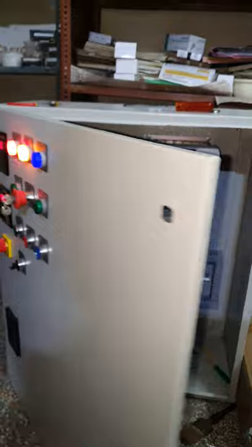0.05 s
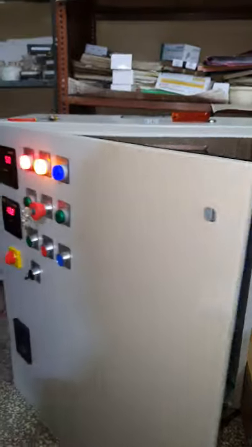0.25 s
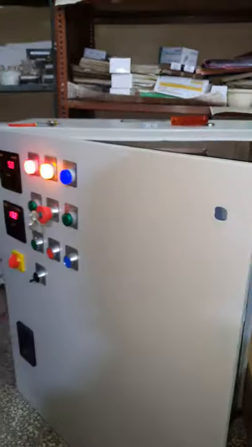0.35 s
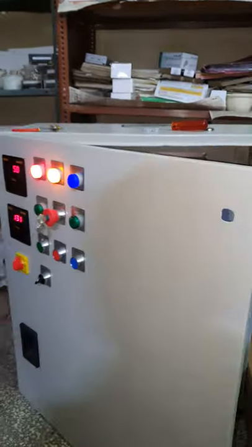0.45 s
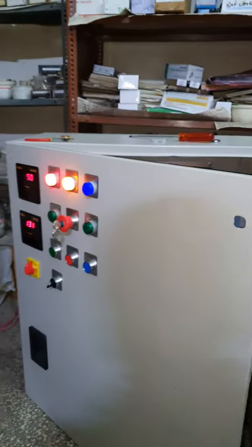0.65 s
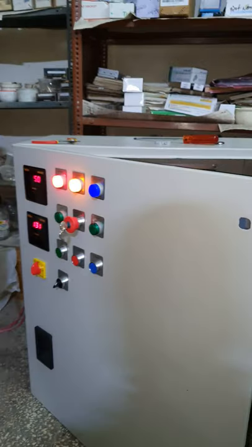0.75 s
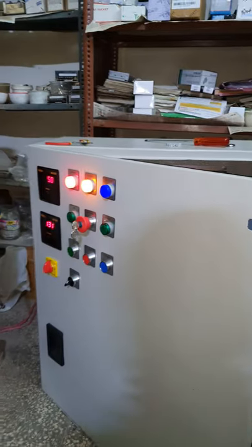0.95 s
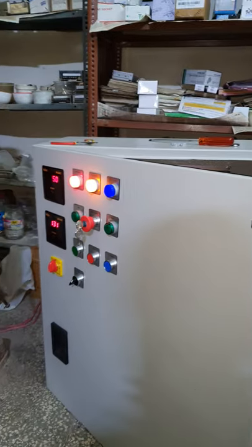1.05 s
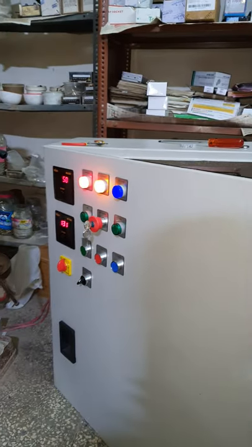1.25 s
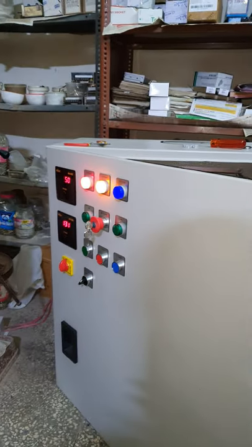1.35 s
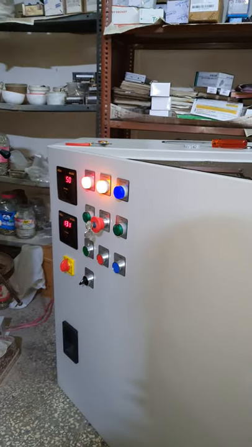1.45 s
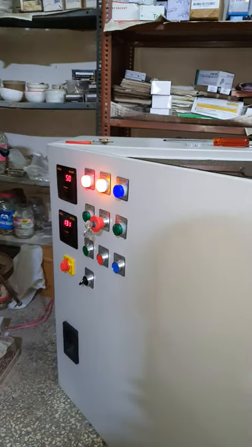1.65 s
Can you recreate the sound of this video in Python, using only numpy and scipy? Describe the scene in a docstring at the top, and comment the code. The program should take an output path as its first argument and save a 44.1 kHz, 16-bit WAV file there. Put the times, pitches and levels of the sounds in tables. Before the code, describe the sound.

A steel cabinet door bangs at about 0.2 seconds, after a faint hinge groan. The panel rebounds, rings and wobbles while loose fittings clatter, dying down by about 0.9 seconds with a faint creak. A duller thud with a sharp click lands at about 1.1 seconds, and a soft last knock comes near 1.6 seconds. A low hum and slight hiss lie underneath in the small workshop.

```python
"""A banging steel cabinet door

A sheet-steel door swings on a hinge that groans faintly by stick-slip friction, and bangs in a small,
hard-walled workshop. The impacts excite the panel's modes: it rings and wobbles, and its loose fittings
clatter. A duller thud and a soft last knock follow. A low hum and a little hiss lie underneath."""
import sys
import numpy as np
from scipy import signal
from scipy.fft import rfft, irfft, next_fast_len
from scipy.io import wavfile
from scipy.ndimage import map_coordinates

SR = 44100
rng = np.random.default_rng(int(sys.argv[2]) if len(sys.argv) > 2 else 0)


def int16_out(signal):
    """Quantize to a 16-bit WAV file."""
    q = np.round(np.clip(np.atleast_2d(signal).T, -1, 1) * 32767)
    wavfile.write(sys.argv[1], SR, q.astype(np.int16))


N = 74970
T = np.arange(N) / SR

# spectrum of rattling and scraping steel: f/Hz, relative level/dB
STEEL_SPECTRUM = [(300, -25), (1500, -5), (5800, 1.5), (8200, -9.5), (11000, -2.5), (13000, -7.5),
                  (15500, -19)]
# likeness of left and right in the room: f/Hz, correlation
COHERENCE = [(100, 0.94), (380, 0.86), (950, 0.15), (2400, 0), (15000, 0.058)]


def amp(db):
    """Amplitude grows tenfold for every 20 dB."""
    return 10 ** (np.asarray(db) / 20)


def along(points, hz):
    """Interpolation of (f/Hz, value) points on a logarithmic frequency axis."""
    f, values = np.transpose(points)
    return np.interp(np.log(hz + 1), np.log(f + 1), values)


def filtered(x, response):
    """Linear filtering: the spectrum is multiplied by a frequency response."""
    size = next_fast_len(N + 8192)
    return irfft(rfft(x, size) * response(np.fft.rfftfreq(size, 1 / SR)), size)[..., :N]


def wobble(rate):
    """Random modulation: a smooth curve through rate Gaussian values a second."""
    return map_coordinates(rng.standard_normal(N // 20), [T * rate], mode="mirror")


def at(onset, x):
    """A pure delay of onset seconds."""
    return np.pad(x, ((0, 0), (max(round(onset * SR), 0), 0)))[:, :N]


def swell(onset, length):
    """A half-sine envelope."""
    return np.sin(np.pi * np.clip((T - onset) / length, 0, 1))


def stereo_angle(hz):
    """Half the phase angle whose cosine is the left-right correlation."""
    return np.arccos(np.clip(along(COHERENCE, hz), -1, 1)) / 2


def noise(spectrum, tilt_db=0, cut_hz=SR, bass_db=0, ripple_db=0):
    """Partly coherent stereo noise of rms 1; ripple gathers the treble into crowded resonances."""
    def response(hz):
        octaves = np.log2((hz + 1) / 1000)
        ripple = map_coordinates(rng.standard_normal(N // 20), [hz / 32])
        peaks = np.clip(ripple, -2, 2) * np.clip(octaves, 0, 1)
        shelf_db = bass_db / (1 + (hz / 280) ** 4)
        db = along(spectrum, hz) + tilt_db * octaves + shelf_db + ripple_db * peaks
        gain = amp(db) / np.hypot(1, (hz / cut_hz) ** 2)
        angle = stereo_angle(hz)
        return gain * np.array([np.cos(angle), np.sin(angle)])
    mid, side = filtered(rng.standard_normal((2, N)), response)
    stereo = np.array([mid + side, mid - side])
    return stereo / np.sqrt(np.mean(stereo ** 2) + 1e-20)


def clang(wash, t60, hold_s, attack_s, grain_db):
    """Reverberation of dense modes: grainy early echoes hold the level, then each band decays."""
    hz, t, bands = signal.stft(wash, SR, nperseg=256)
    fade = amp(-60 * np.maximum(t - hold_s, 0) / along(t60, hz)[:, None])
    tail = signal.istft(bands * fade, SR, nperseg=256)[1][:, :N]
    grain = amp(grain_db * wobble(862) * np.exp(-T / 0.016))
    return tail * grain * (1 - np.exp(-T / attack_s))


def ring(modes, hits, rise_s, drift_rad, flutter_db):
    """Damped, unsteady modes sum the energy of the hits (t/s, level/dB); each ear has its own phase."""
    out = np.zeros((2, N))
    ages = [(np.maximum(T - onset, 0), db) for onset, db in hits]
    for hz, db, t60 in modes:
        energy = sum((amp(level - 60 * age / t60) * (1 - np.exp(-age / rise_s))) ** 2
                     for age, level in ages)
        apart = stereo_angle(hz) * rng.choice([-1, 1]) * np.array([[1], [-1]])
        phase = 2 * np.pi * (hz * T + rng.random()) + drift_rad * wobble(25.56) + apart
        out += amp(db + flutter_db * wobble(21.59)) * np.sqrt(energy) * np.sin(phase)
    return out


def stick_slip(pitch_hz, levels, jitter_hz, rasp, rasp_hz):
    """Stick-slip oscillation: uneven slips spread hoarse sidebands around a tone."""
    phase = 2 * np.pi * np.cumsum(pitch_hz + jitter_hz * wobble(260)) / SR
    sidebands = np.array([wobble(rasp_hz) * np.sin(phase) + wobble(rasp_hz) * np.cos(phase)
                          for _ in range(2)])
    db = np.interp(T, *levels, left=-np.inf, right=-np.inf) + 1.8 * wobble(70.4)
    return amp(db) * (np.sin(phase) + rasp * sidebands) / np.hypot(1, rasp)


def glide(points, **roughness):
    """Stick-slip oscillation whose pitch and level follow (t/s, f/Hz, level/dB) points."""
    times, hz, db = np.transpose(points)
    return stick_slip(np.interp(T, times, hz), (times, db), **roughness)


def workshop():
    """Background noise: a low rumble and a hum that wavers by phase modulation."""
    hum_tones = [(97, -76.5), (140, -73.5)]  # f/Hz, level/dB
    rumble_spectrum = [(20, -15.5), (45, -6.5), (80, 6.5), (150, -6), (300, -9), (600, -28.5), (4000, -38),
                       (8000, -46)]  # f/Hz, relative level/dB
    hum = sum(amp(db) * np.sqrt(2) * np.sin(2 * np.pi * hz * T + 0.99 * wobble(9))
              for hz, db in hum_tones)
    return amp(-65.5) * noise(rumble_spectrum) + hum


def hinge():
    """Friction: the sliding door rubs and scrapes; stick-slip makes its hinge groan, creak and squeal."""
    rub_levels = [(0, -69.5), (.2, -70.5), (.72, -77.5), (1.07, -80.5), (1.25, -100), (1.5, -100),
                  (1.55, -80.5)]  # t/s, level/dB
    rub_spectrum = [(200, -46), (600, 17), (1400, -2.5), (2300, 2), (5500, -4.5), (8000, -15),
                    (11000, -10.5), (15000, -25)]  # f/Hz, relative level/dB
    scrapes = [(0.607, 0.079, -60.5), (0.852, 0.23, -74)]  # t/s, length/s, level/dB
    closing_groan = [(0, 578, -67.5), (.035, 509.3, -60.5), (.125, 496, -56.5), (.175, 490.4, -60),
                     (.23, 443, -54.5)]  # t/s, f/Hz, level/dB
    backswing_creak = [(.78, 988, -88.5), (.91, 866, -73), (1.07, 828, -78.5)]  # t/s, f/Hz, level/dB
    squeal_levels = [(.66, -81), (.83, -78), (.89, -91), (1.219, -77), (1.31, -95), (1.38, -80),
                     (1.43, -98)]  # t/s, level/dB
    rub = amp(np.interp(T, *np.transpose(rub_levels))) * noise(rub_spectrum, ripple_db=2.5)
    scrape = sum(amp(db) * swell(onset, length) for onset, length, db in scrapes) * noise(STEEL_SPECTRUM)
    groan = glide(closing_groan, jitter_hz=17.3, rasp=0.52, rasp_hz=217)
    creak = glide(backswing_creak, jitter_hz=34.6, rasp=0.95, rasp_hz=148)
    squeal = stick_slip(pitch_hz=3363, levels=np.transpose(squeal_levels),
                        jitter_hz=29.8, rasp=0.57, rasp_hz=118.3)
    return rub + scrape + groan + creak + squeal


def clatter():
    """Intermittent contact: loose fittings jump against the sheet, ring brightly and land with ticks."""
    rattles = [(0.1982, -59, -5, -65), (.2135, -58, -8, -49), (0.236, -50.5, -0.5, -52),
               (0.3956, -56, 3, -60.5), (0.4283, -54.5, -4.5, -71), (0.451, -61, -3, -55),
               (0.528, -62, -2, -66), (.594, -60.5, 1.5, -65.5), (0.786, -70.5, 1, -80)]  # t/s, level/dB, tilt/(dB per octave), ringing level/dB
    decay_times = [(2000, 0.6), (12000, 0.62)]  # f/Hz, T60/s
    landings = [(0.2443, -49.5), (0.3938, -66), (.4285, -60), (0.857, -67.5)]  # t/s, level/dB
    fitting_modes = [(1753, -5.5, 0.42), (2415, -3.5, 0.16), (3065, -5, 0.39), (3450, -9, 0.36),
                     (4040, -10.5, .5)]  # f/Hz, relative level/dB, T60/s
    clashes = ticks = 0
    for onset, db, tilt, _ in rattles:
        wash = noise(STEEL_SPECTRUM, tilt, ripple_db=3.0)
        clashes += at(onset, amp(db) * clang(wash, decay_times, hold_s=0.022, attack_s=0.00028, grain_db=2))
    for onset, db in landings:
        ticks += at(onset, amp(db) * noise(STEEL_SPECTRUM, tilt_db=12, ripple_db=2.0) * np.exp(-T / 0.02))
    hits = [(onset, db) for onset, *_, db in rattles]
    return clashes + ticks + ring(fitting_modes, hits, rise_s=0.0021, drift_rad=0.66, flutter_db=4.0)


def bang():
    """Impact excitation of a plate: the door strikes and rebounds, the softest blows being darkest."""
    blows = [(0.2141, -43.5, 2, 2.5, -68), (.238, -50, 1, 6.5, -47), (.277, -46, 1, -1.5, -45),
             (.35, -49, -4, -29, -48.5), (.432, -47.5, 0, -11, -52.5), (.492, -50.5, -1.5, -9, -51),
             (.58, -53, -10.5, -1, -51.5), (.688, -58, -9.5, 20, -89)]  # t/s, level/dB, tilt/(dB per octave), bass shelf/dB, ringing level/dB
    spectrum = [(40, -47.5), (110, 4.5), (250, -4.5), (1150, -10), (1700, -20), (3600, -26.5), (15000, -73)]  # f/Hz, relative level/dB
    decay_times = [(100, 1), (1000, 0.57), (4000, 0.92)]  # f/Hz, T60/s
    panel_modes = [(127.8, -1.5, 0.67), (176, -5.5, 0.476), (223, -0.5, .61), (252, -3.5, 0.69),
                   (428.7, 6, .42), (500, -2, 0.34), (571, 2.5, 0.34), (630, -7, 0.52), (855, -9, 0.42)]  # f/Hz, relative level/dB, T60/s
    crashes = 0
    for onset, db, tilt, bass, _ in blows:
        wash = noise(spectrum, tilt, bass_db=bass, ripple_db=4.0)
        crash = clang(wash, decay_times, hold_s=0.039, attack_s=0.00047, grain_db=1.5)
        crashes += at(onset, amp(db) * crash)
    hits = [(onset, db) for onset, *_, db in blows]
    return crashes + ring(panel_modes, hits, rise_s=0.013, drift_rad=0.23, flutter_db=2.5)


def crack():
    """Hard contact: the steel edge meets the frame in short transients, strongest in the upper middle."""
    contacts = [(0.2145, -46.5, 0.047), (1.0751, -51.5, 0.0019)]  # t/s, level/dB, time constant/s
    spectrum = [(600, -24), (2400, 2.5), (3800, 1.5), (9000, -22.5)]  # f/Hz, relative level/dB
    return sum(at(onset, amp(db) * noise(spectrum) * np.exp(-T / decay)) for onset, db, decay in contacts)


def flex():
    """Bending vibration: the whole sheet wobbles in its lowest mode, in swells."""
    swells = [(0.232, 0.16, -50), (0.385, 0.27, -52.5), (0.628, 0.054, -50), (0.659, 0.165, -49),
              (0.85, 0.13, -56.5)]  # t/s, length/s, level/dB
    mode_hz = 78.94
    energy = sum((amp(db) * swell(onset, length)) ** 2 for onset, length, db in swells)
    phase = 2 * np.pi * (mode_hz * T + rng.random()) + 0.29 * wobble(15.3)
    return np.sqrt(2 * energy) * np.sin(phase)


def thuds():
    """Soft contact acts as a low-pass: the door lands, chatters and knocks again, ringing the frame."""
    knocks = [(1.074, -48, 7260), (1.0904, -48, 8000), (1.121, -52, 6000), (1.166, -59, 1300),
              (1.572, -59.5, 1470)]  # t/s, level/dB, treble cut-off/Hz
    spectrum = [(40, -13), (130, -2), (1050, -3), (1400, -11.5), (3400, -23.5), (7000, -39.5), (14000, -43)]  # f/Hz, relative level/dB
    decay_times = [(100, 0.65), (1000, 0.34), (12000, 0.25)]  # f/Hz, T60/s
    frame_modes = [(138.4, -9, 0.5), (246, -8.5, 0.62), (571, -10.5, 0.43), (639, -2, 0.27),
                   (797, -14, 0.29), (1011, -5, 0.36), (1150, -10.5, 0.4)]  # f/Hz, relative level/dB, T60/s
    thumps = 0
    for onset, db, cut_hz in knocks:
        wash = noise(spectrum, cut_hz=cut_hz, ripple_db=5.5)
        thump = clang(wash, decay_times, hold_s=0.035, attack_s=0.00046, grain_db=4.0)
        thumps += at(onset, amp(db) * thump)
    hits = [(onset, db) for onset, db, _ in knocks]
    return thumps + amp(2) * ring(frame_modes, hits, rise_s=0.0044, drift_rad=0.3, flutter_db=3.5)


def scene():
    """Superposition of all sources; a level difference between the ears leans them slightly left."""
    balance = [(150, 0), (450, 2.5), (1300, 0.3), (4400, -1.3), (8500, 4.5), (15000, 2.5)]  # f/Hz, left minus right level/dB
    mix = crack() + bang() + clatter() + thuds() + flex() + hinge() + workshop()
    return filtered(mix, lambda hz: amp(along(balance, hz) * np.array([[1], [-1]]) / 2))


def record(dry):
    """Band limiting: a steep low-pass removes the highest treble."""
    cutoff_hz = 15550
    return filtered(dry, lambda hz: 1 / np.hypot(1, (hz / cutoff_hz) ** 200))


dry = scene()
out = record(dry)
int16_out(out)
```